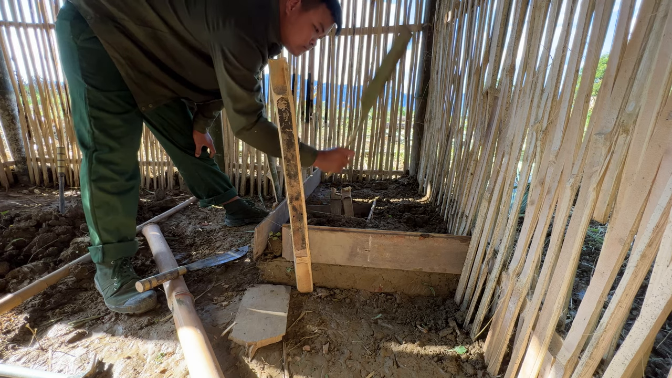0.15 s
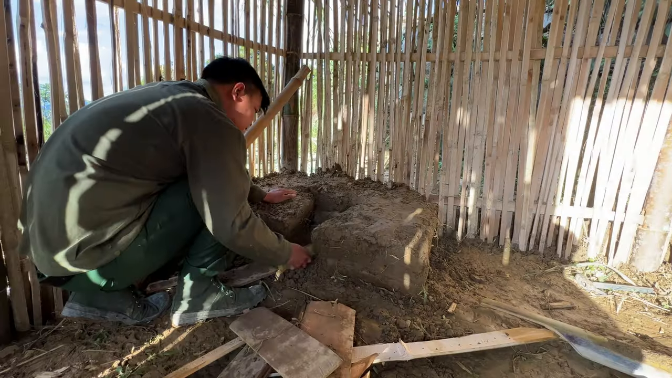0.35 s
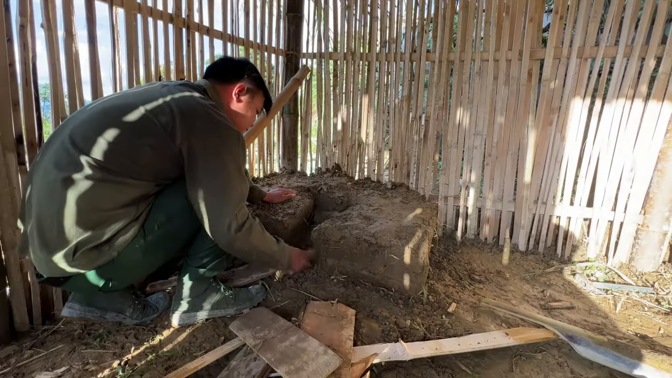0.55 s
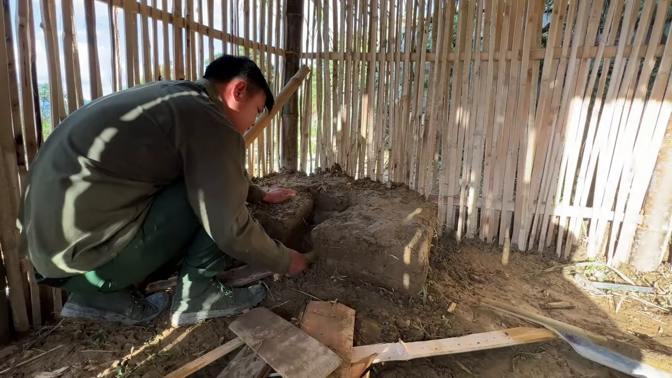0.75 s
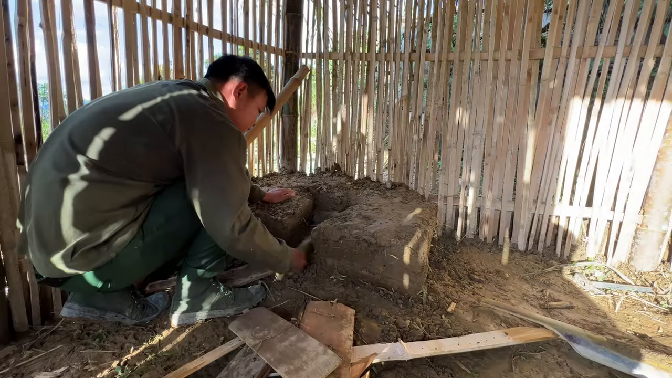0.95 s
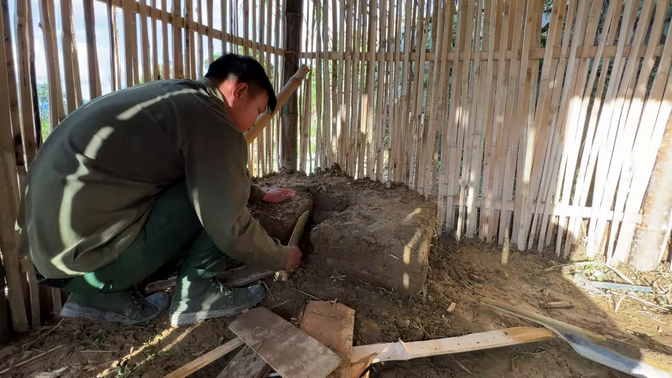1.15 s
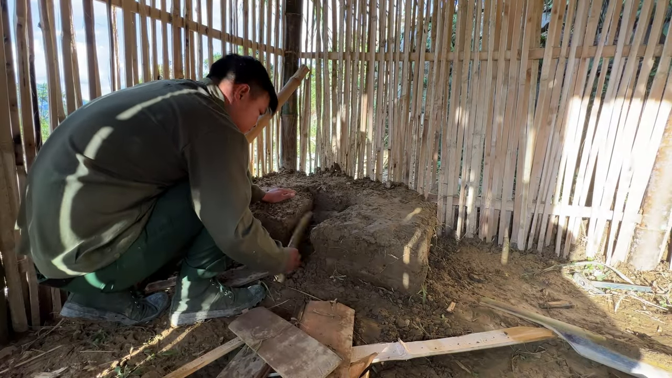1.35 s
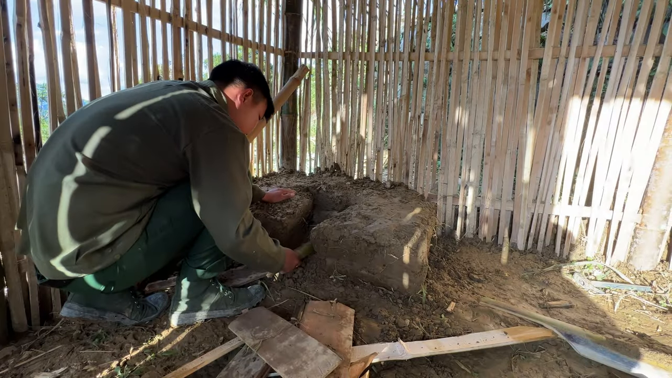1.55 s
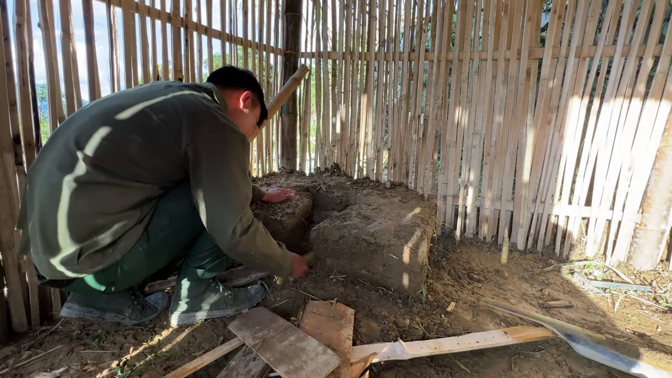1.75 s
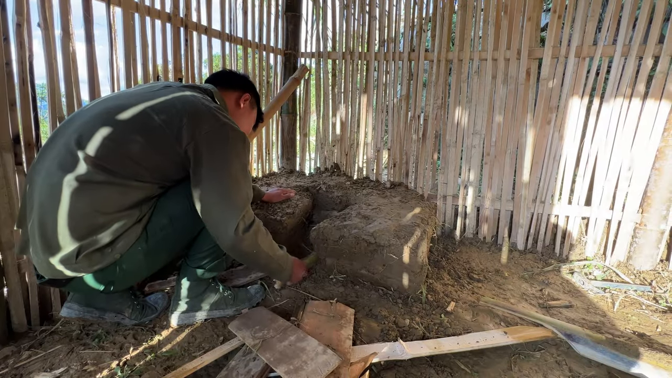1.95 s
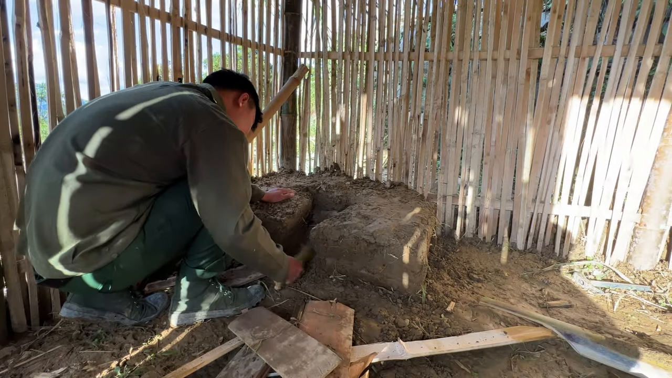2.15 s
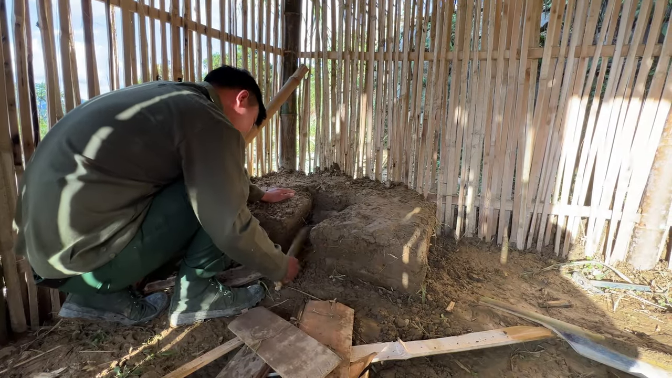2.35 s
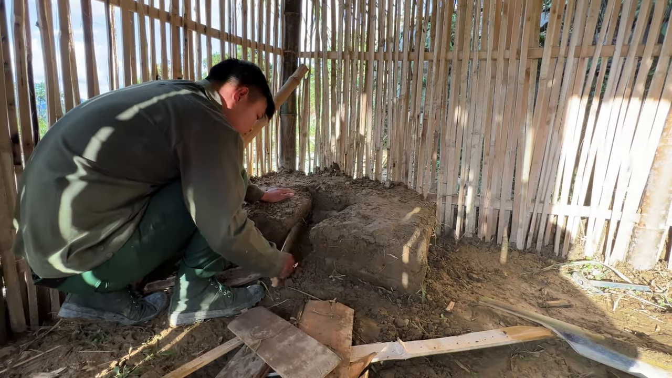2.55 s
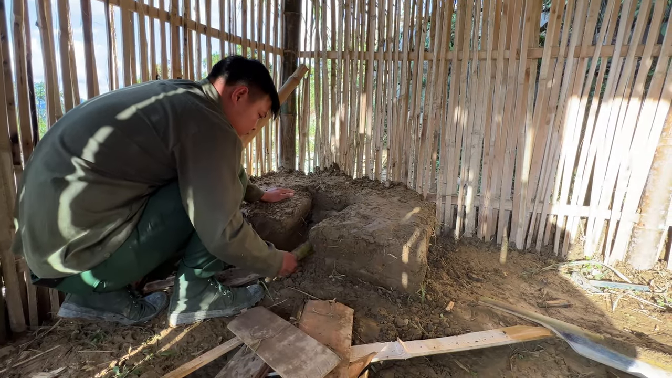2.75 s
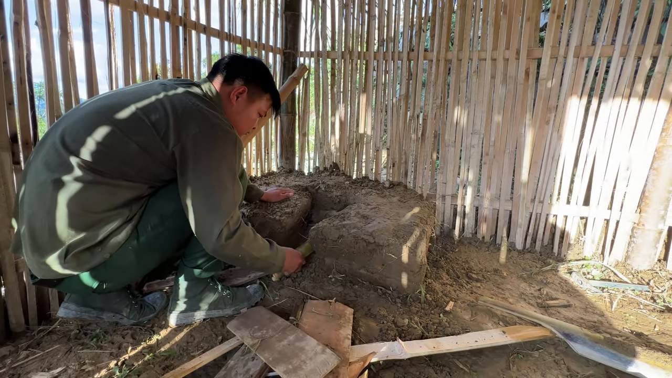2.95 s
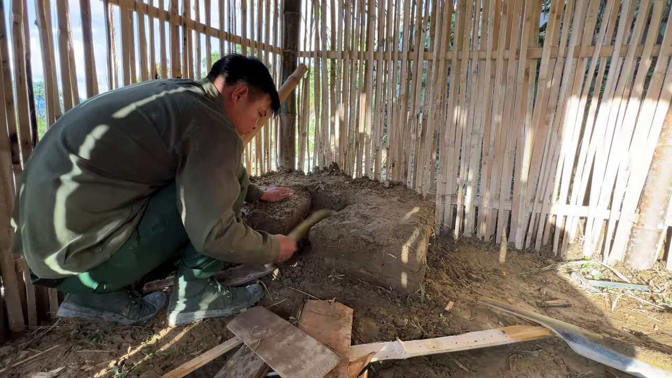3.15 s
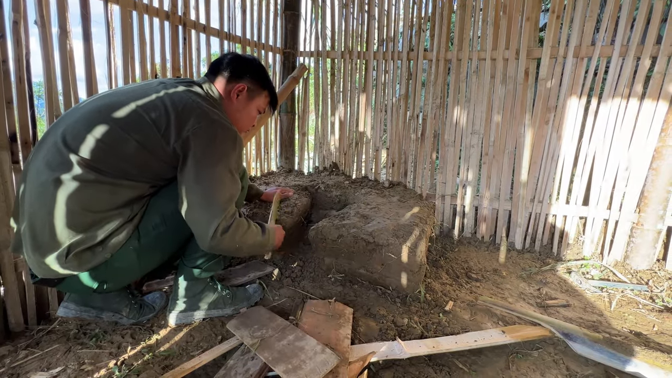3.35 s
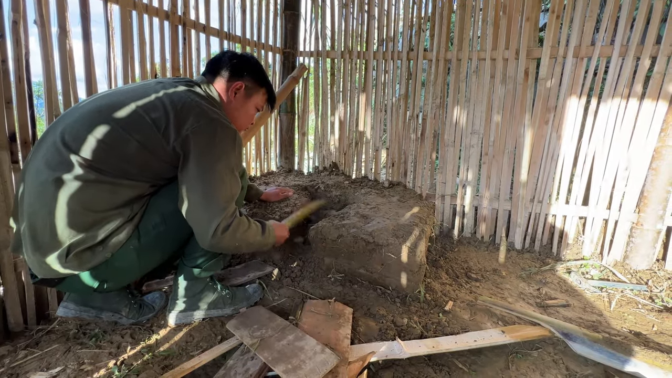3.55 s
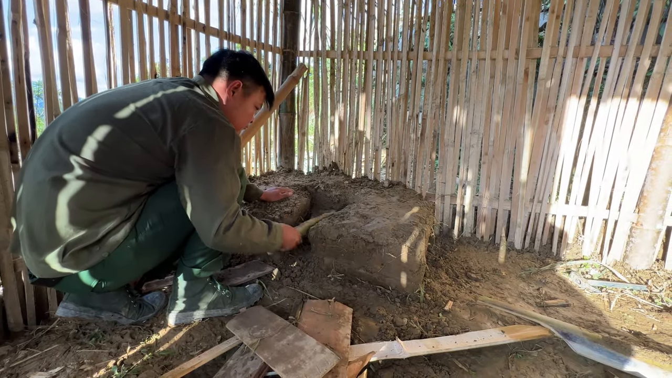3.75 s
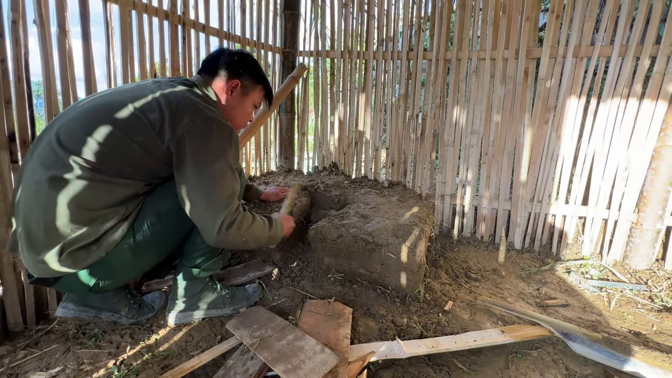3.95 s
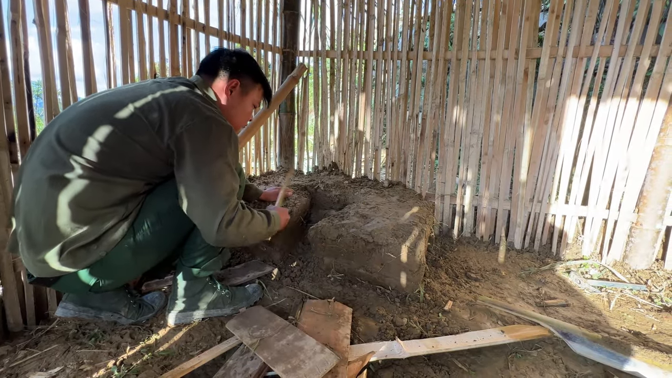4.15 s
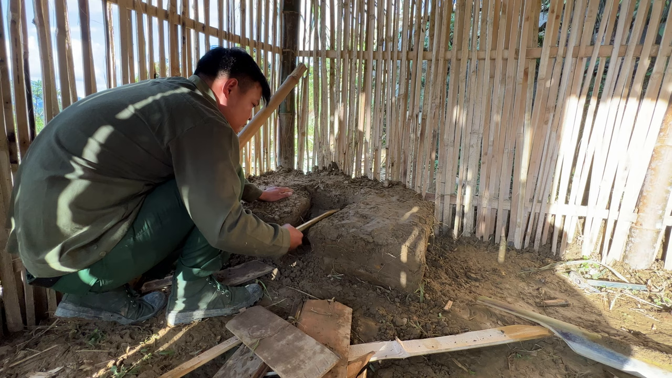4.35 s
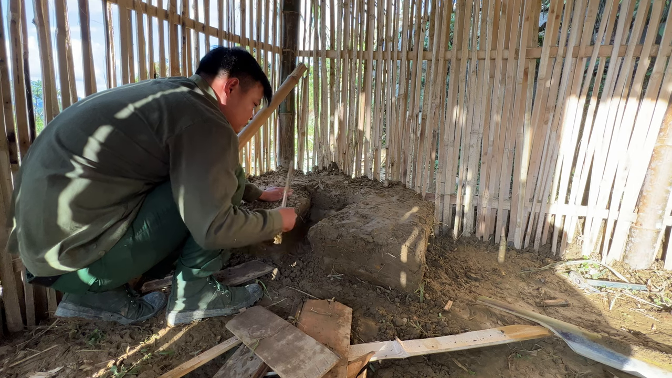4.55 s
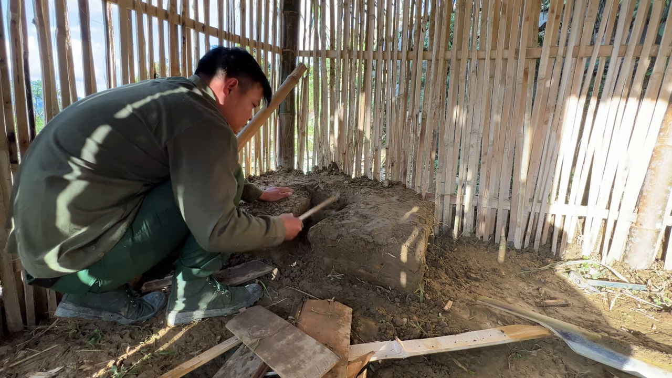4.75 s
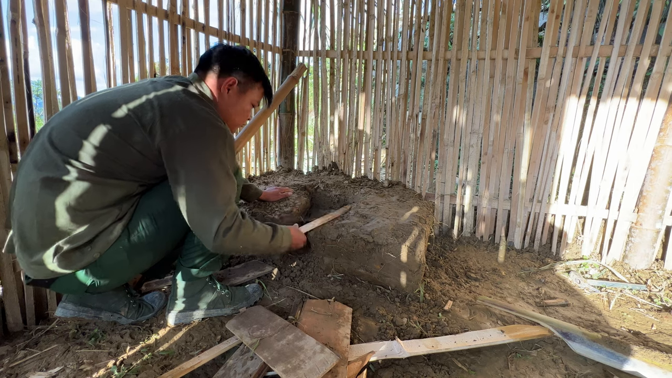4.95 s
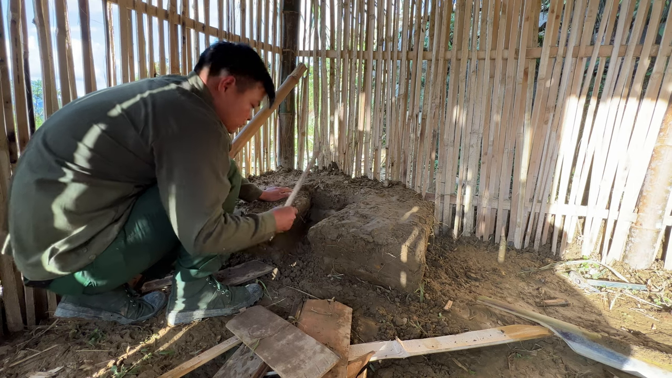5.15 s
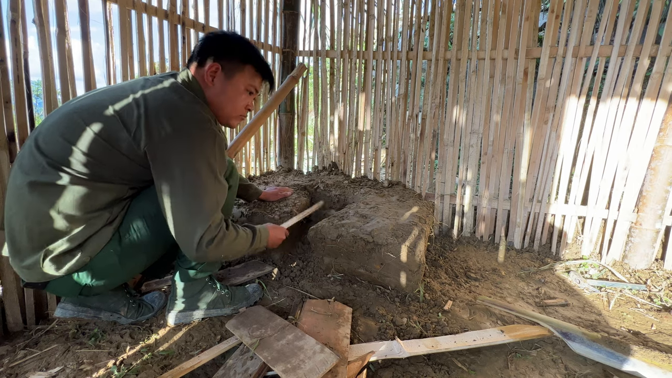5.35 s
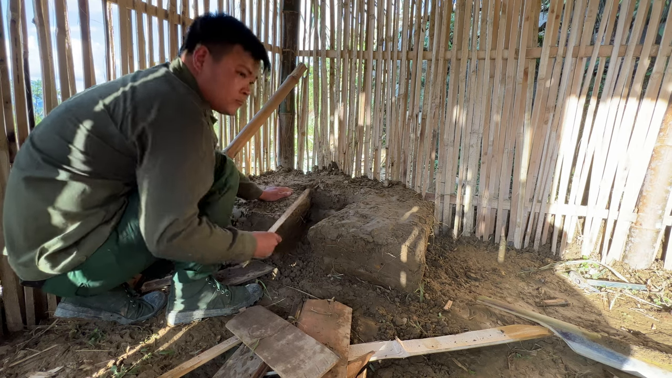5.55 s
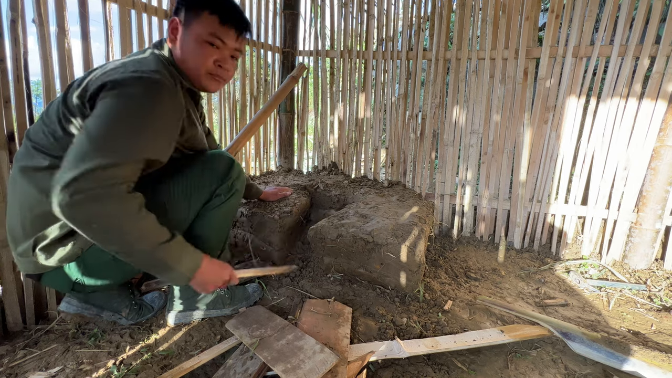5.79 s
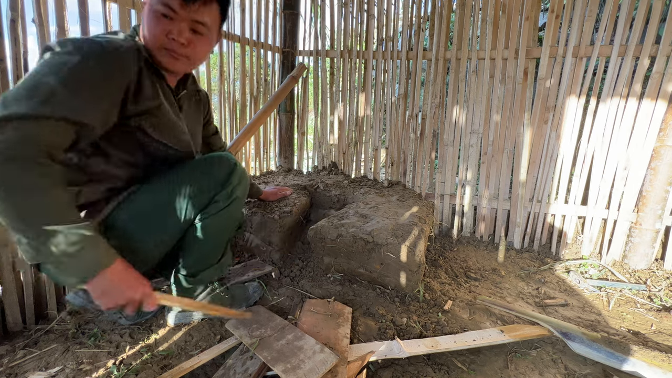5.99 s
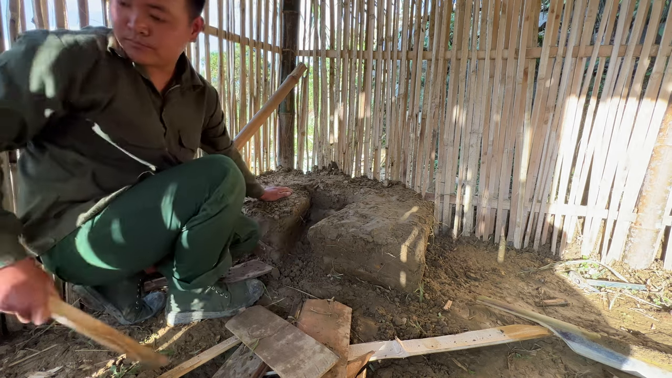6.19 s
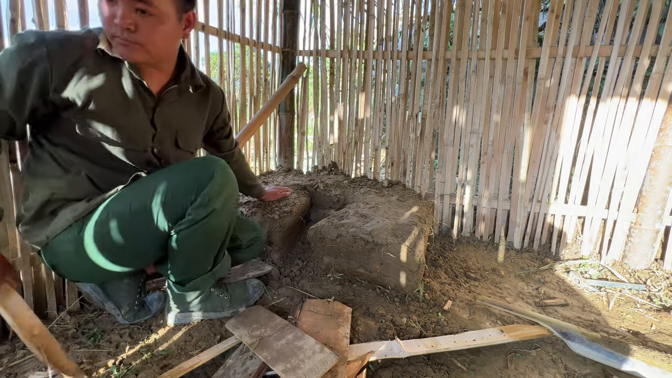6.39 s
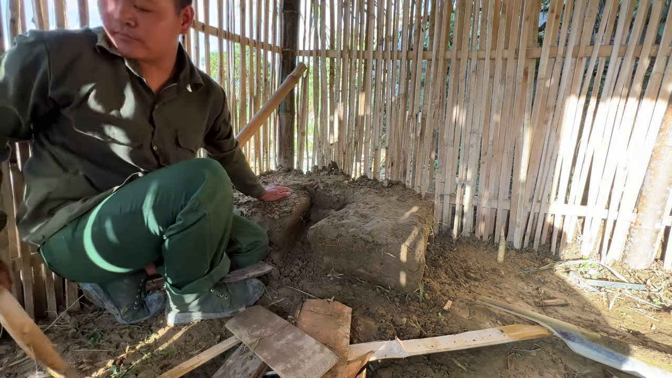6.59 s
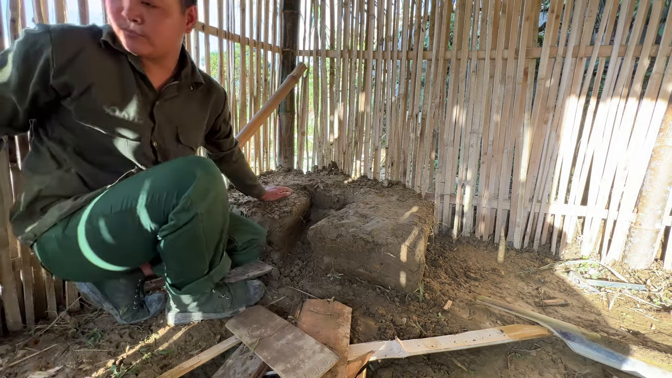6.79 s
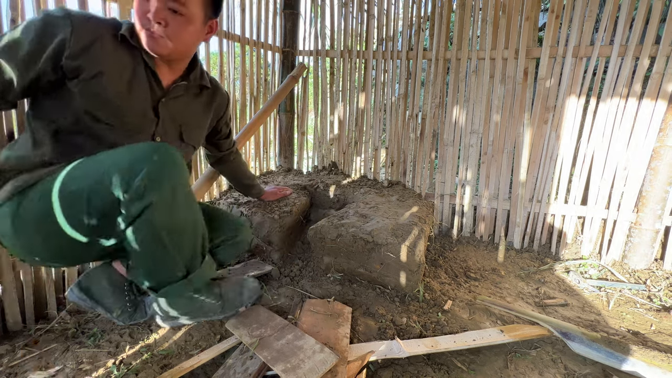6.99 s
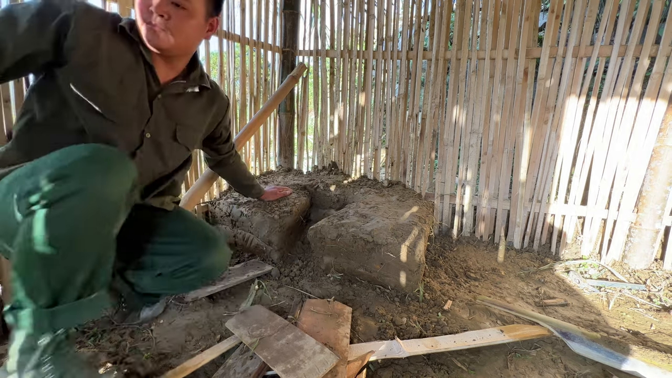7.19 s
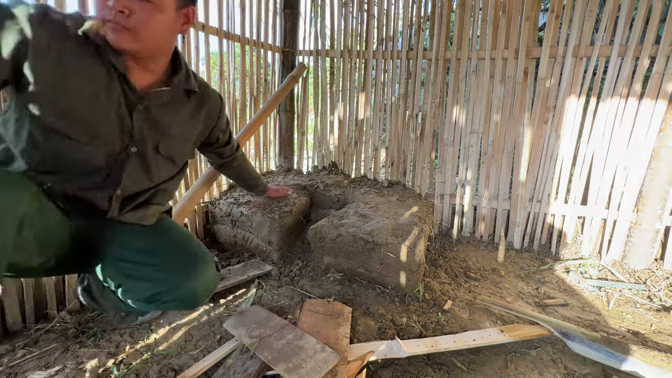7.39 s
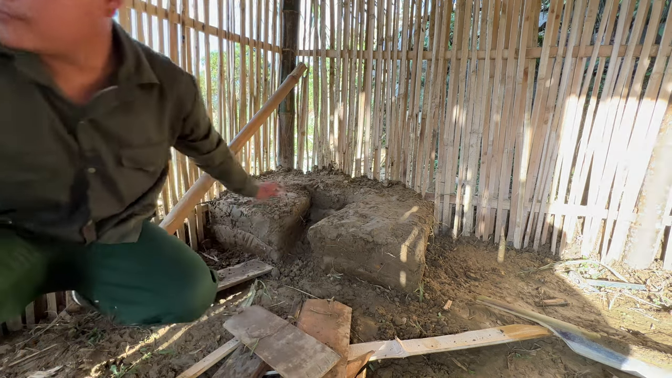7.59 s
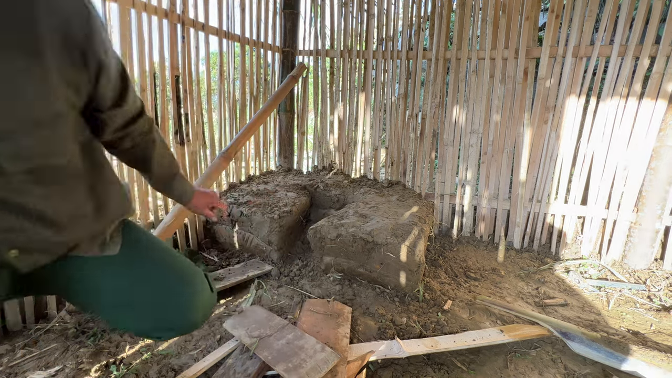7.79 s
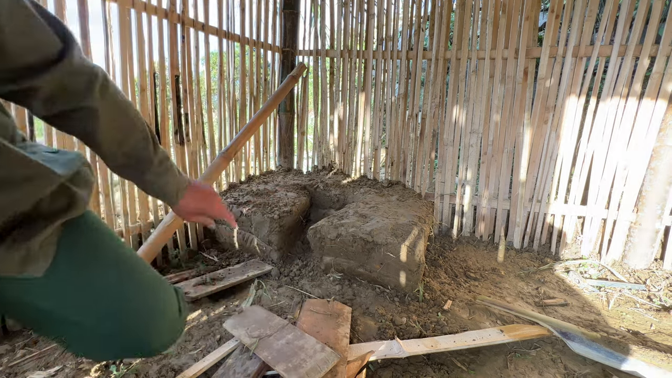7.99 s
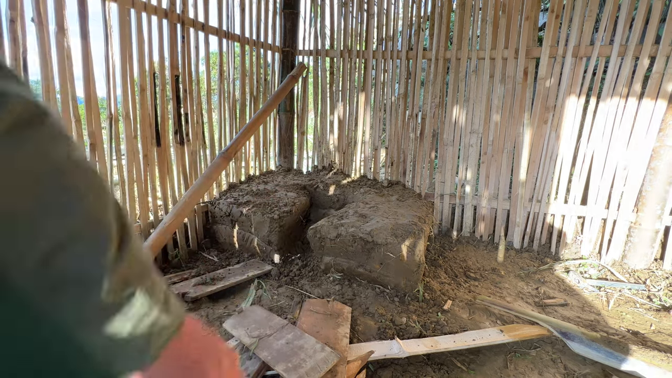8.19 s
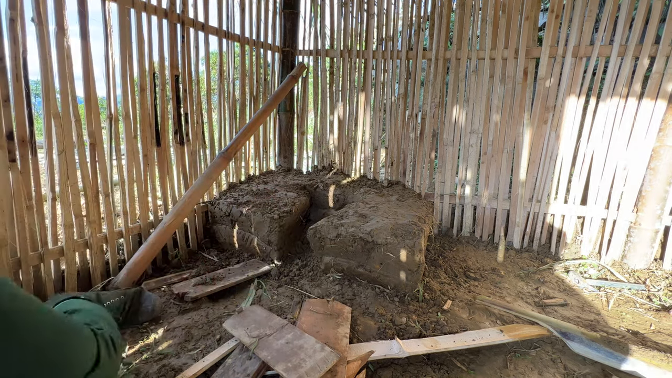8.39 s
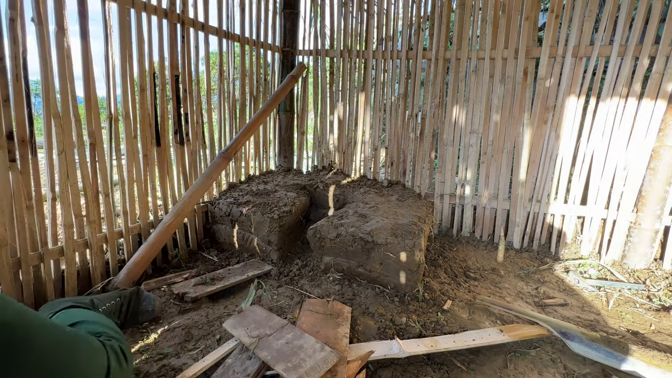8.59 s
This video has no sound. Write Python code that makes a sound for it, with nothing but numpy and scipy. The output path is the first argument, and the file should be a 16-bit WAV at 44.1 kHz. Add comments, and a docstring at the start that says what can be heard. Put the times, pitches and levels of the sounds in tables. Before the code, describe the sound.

Crickets and cicadas trill outdoors. Right at the start one hard blow rings a plank form. Then a short wooden stick tamps an earth mound, light and loud taps alternating, later slower and stronger, each with a click, gritty spray and low thud. After about five seconds the blows stop; cloth rustles, shoes scuff, twigs snap and one heavy step knocks. Close microphone in a slatted shelter, sounds leaning left, short dense tail.

```python
"""Insects sing outdoors, with a nearer wash and cricket heard only at the opening; a plank form takes one blow.
A short wooden stick tamps an earth mound inside a slatted shelter: clicks, rings, grit and a thud make each
blow. The worker then turns and rises: grainy noise makes cloth rub, and shoes scuff and twigs snap in short
bursts. Crickets and cicadas are noise in narrow resonances, over a far rumble and air."""
import sys
import numpy as np
from scipy import signal
from scipy.fft import rfft, irfft, next_fast_len
from scipy.io import wavfile

SR = 44100
rng = np.random.default_rng(int(sys.argv[2]) if len(sys.argv) > 2 else 0)


def wrap_up_sound(samples):
    """Save the sound to the file named by the first command line argument, as 16-bit audio."""
    columns = np.atleast_2d(samples).T
    # keep every value between -1 and 1, then stretch to whole-number steps
    tamed = np.clip(columns, -1, 1)
    steps = np.round(tamed * 32767).astype(np.int16)
    wavfile.write(sys.argv[1], SR, steps)


N = 380583

# Borders between the eight pitch ranges ("parts") of a blow: border_hz
PARTS_HZ = [130, 420, 800, 1500, 2200, 4000, 9000]
WASH_END_S = 0.415   # the nearer wash and cricket stop here


def from_db(db):
    """Decibels to a plain gain."""
    return 10 ** (np.asarray(db) / 20)


def rms_one(x):
    """Scale a sound to an average (rms) strength of 1."""
    return x / np.sqrt(np.mean(x ** 2) + 1e-20)


def in_time(rows):
    """Join the points of each column by straight lines over the whole scene."""
    s, *columns = np.transpose(rows)
    return [np.interp(np.arange(N) / SR, s, column) for column in columns]


def at_hz(points, hz):
    """Read a curve of (pitch_hz, value) points, spaced by musical interval."""
    points_hz, values = np.transpose(points)
    return np.interp(np.log(hz), np.log(points_hz), values)


def band(x, low_hz, high_hz):
    """Keep one range of pitches."""
    sos = signal.butter(2, [low_hz, min(high_hz, 19000)], "band", fs=SR, output="sos")
    return signal.sosfilt(sos, x)


def drift(rate_hz):
    """Slow random wandering with spread 1, made at every 40th sample."""
    r = np.exp(-80 * np.pi * rate_hz / SR)
    draws = rng.standard_normal(N // 40 + 2002)
    slow = signal.lfilter([1], [1, -2 * r, r * r], draws)[2000:]
    return np.interp(np.arange(N) / 40, np.arange(len(slow)), rms_one(slow))


def shaped(length, db_at, likeness=None):
    """Stereo noise of a given spectrum; how alike the sides are and how far it leans left vary with pitch."""
    # Usual likeness of the two sides: pitch_hz, likeness (1 = same, -1 = opposite)
    usual_likeness = [(60, 1), (240, 0.24), (950, -0.7), (3770, 0.44), (15000, 0.33)]
    # Lean to the left: pitch_hz, left_over_right_db
    left_lean = [(60, -2), (180, 1.5), (550, 3.5), (1650, 2), (4970, 9), (15000, -0.5)]
    hz = np.maximum(np.fft.rfftfreq(length, 1 / SR), 10)
    mid, side = rfft(rng.standard_normal((2, length)))
    alike = np.clip(at_hz(usual_likeness if likeness is None else likeness, hz), -1, 1)
    pair = np.sqrt(1 + alike) * mid + np.sqrt(1 - alike) * side * [[1], [-1]]
    lean_db = at_hz(left_lean, hz) * [[.5], [-.5]]
    return irfft(pair * from_db(db_at(hz) + lean_db), length)


def noise(spectrum):
    """Steady stereo noise with the colour of a table, rms 1."""
    return rms_one(shaped(next_fast_len(N), lambda hz: at_hz(spectrum, hz))[:, :N])


def to_ears(x, lean_db):
    """A source on the left reaches the right side later, weaker and with less treble around 6 kHz."""
    right_lag = 3   # samples
    treble = signal.lfilter(*signal.butter(1, [4200, 7800], "band", fs=SR), x)
    right = from_db(-1.5) * x - treble * (1 - from_db(-lean_db))
    return np.array([x, np.roll(right, right_lag)])


def shelter(x):
    """Slats and ground scatter a sound into a dense tail that dies band by band, with a new pattern each time."""
    # How long the tail takes to fall 60 dB: pitch_hz, fade_s
    tail_fade = [(100, 0.2), (400, 0.12), (1100, 0.13), (3000, 0.12), (6000, 0.15), (9000, 0.1),
                 (12000, 0.16), (15000, 0.033)]
    # Colour of the scattered sound: pitch_hz, level_db
    tail_colour = [(100, -2), (300, -4.5), (800, -4.5), (2000, -1.5), (4500, 0), (6500, 2.5), (9000, -1.5),
                   (12000, 1), (15000, -12)]
    # Likeness of the two sides of the tail: pitch_hz, likeness
    tail_likeness = [(60, 1), (250, 0.24), (900, .3), (3000, 0.04), (15000, 0.05)]
    length = len(x)
    edges = 60 * 2 ** np.arange(0, 8.6, .75)
    t = np.arange(length) / SR
    white = shaped(length, lambda hz: at_hz(tail_colour, hz), tail_likeness)
    tail = np.zeros((2, length))
    for low, high in zip(edges, edges[1:]):
        tail += band(white, low, high) * from_db(-60 * t / at_hz(tail_fade, low))
    tail *= np.clip(t / 0.0051 - .5, 0, 1)   # first reflections need a few ms
    tail /= np.sqrt(np.sum(tail ** 2) / 2)
    return signal.fftconvolve(x[None], tail, axes=1)[:, :length]


def place(out, s, sound, scattered, room_db):
    """Add the direct sound and the tail of its scattered share, from time s."""
    both = to_ears(sound, lean_db=19.0) + from_db(room_db) * shelter(scattered)
    return out + np.pad(both, [(0, 0), (round(s * SR), N)])[:, :N]


def song(resonances, throb):
    """Many wing strokes blur to noise in narrow resonances, pulsed by the throb."""
    def lines(hz):
        power = sum(from_db(2 * db) / (1 + ((hz - top) / max(width, 5) * 2) ** 4)
                    for top, width, db in resonances)
        return 10 * np.log10(power)
    return rms_one(throb * shaped(next_fast_len(N), lines)[:, :N])


def rumble_and_air(air_db):
    """Far rumble and air: two coloured noises whose levels wander."""
    # Colour of the rumble: pitch_hz, relative_db (per Hz)
    rumble_colour = [(15, -44), (25, -25), (37, 1.5), (59, 2), (145, -3), (216, -19.5), (339, -8),
                     (600, -26), (780, -32.5), (1320, -120)]
    # Colour of the air: pitch_hz, relative_db
    air_colour = [(240, -63), (400, -34), (914, -18), (989, -26.5), (1070, -19), (3380, -26), (4200, -23),
                  (5460, -46.5), (9240, -120)]
    rumble = from_db(-70 + 1.8 * drift(4)) * noise(rumble_colour)
    return rumble + from_db(air_db + 1.2 * drift(13)) * noise(air_colour)


def cicada_wash(cicada_db):
    """Cicadas blend into a coloured noise; a nearer wash is heard with it only at the opening."""
    # Colour of the lasting wash: pitch_hz, relative_db
    wash_colour = [(2500, -34.5), (3900, -8), (5000, -6.5), (6000, -5), (7500, -1), (8500, -11.5),
                   (9500, -10), (11500, -23.5), (12500, -43.5), (16000, -72)]
    # Colour of the nearer opening wash: pitch_hz, relative_db
    near_colour = [(1000, -41.5), (1900, -16), (2500, -6), (4200, -10), (6000, -5), (8000, -16.5),
                   (9500, -36.5)]
    wash = from_db(cicada_db + 9.5 + 1.3 * drift(40)) * noise(wash_colour)
    near = from_db(-58.5 + 1.3 * drift(30)) * noise(near_colour)
    return wash + near * (np.arange(N) < WASH_END_S * SR)


def crickets():
    """A steady cricket trill near 4.5 kHz throbs unevenly and fades at the end."""
    # Wing resonances: pitch_hz, width_hz, relative_db
    cricket_wings = [(4340, 230, -5.5), (4586, 17, 7), (4480, 420, -3.5)]
    level_db, fade_start_s, fade_db_per_s = -63, 8.4, 155
    t = np.arange(N) / SR
    throb_turns = np.cumsum(23.5 + 2.2 * drift(1)) / SR   # about 23.5 throbs a second
    trill_db = 1.6 * np.sin(2 * np.pi * throb_turns) + 0.8 * drift(7.8) + 1.2 * drift(0.81)
    fading_db = level_db - fade_db_per_s * (t - fade_start_s).clip(0)
    return from_db(fading_db) * song(cricket_wings, from_db(trill_db))


def chirpers():
    """Each chirping cricket is stronger for about half of its period, and its level wanders a little."""
    # Crickets: wing resonances (pitch_hz, width_hz, relative_db), chirp_middle_s, period_s,
    # level points (time_s, level_db)
    chirping = [([(8510, 290, 0)], .485, .2115, [(.41, -70.5), (2.4, -66), (3.1, -73), (3.2, -100)]),
                ([(8380, 220, 0)], 8.53, 0.18, [(4.2, -85), (5.4, -78), (7.6, -68.5), (8.63, -67)])]
    t = np.arange(N) / SR
    out = np.zeros((2, N))
    for wing, middle, period, level in chirping:
        chirp_db = 2.9 * np.tanh(2.2 * np.cos(2 * np.pi * (t - middle) / period))
        level_db = in_time(level)[0] + 0.54 * drift(8)
        out += from_db(level_db) * song(wing, from_db(chirp_db))
    return out


def cicada_swell():
    """One cicada swells, holds and fades: fast uneven tymbal buzz in a broad body resonance."""
    # Level of the swell: time_s, level_db
    swell_level = [(1.1, -91.5), (1.52, -56), (2.15, -53), (2.5, -85.5)]
    # Resonances of tymbal and body: pitch_hz, width_hz, relative_db
    tymbal = [(4730, 320, -4.5), (6100, 1000, -2.5), (6200, 410, -14.5)]
    buzz = from_db(3.4 * drift(60) + 1.7 * drift(8))
    return from_db(in_time(swell_level)[0]) * song(tymbal, buzz)


def near_cricket(stroke_hz, wing_hz, width_hz):
    """Slightly uneven strokes pulse one wing resonance, a narrow noise with side bands, heard only at the
    opening."""
    turns = np.cumsum(1 + 0.0055 * drift(17)) / SR
    pulsing = 1 + 0.53 * np.cos(2 * np.pi * stroke_hz * turns)
    blur = rms_one(band(rng.standard_normal(N), wing_hz - width_hz, wing_hz + width_hz))
    singing = np.arange(N) < WASH_END_S * SR
    return from_db(-62.5 + 2.5 * drift(11)) * singing * rms_one(pulsing * blur)


def outdoors():
    """Far rumble and air, a cicada wash and crickets add up outside."""
    # Levels before wandering: time_s, air_db, cicada_db (the wash then gains 9.5 dB)
    outdoor_levels = [(0, -72, -80.5), (.5, -73, -79), (1.9, -66.5, -69), (2.8, -72, -76.5),
                      (4.9, -71.5, -75.5), (5.7, -80, -75.5), (6.34, -82, -70.5), (6.7, -78.5, -79.5),
                      (7.09, -61.5, -68), (7.5, -73, -74), (8.1, -63, -72.5), (8.63, -82, -79.5)]
    air_db, cicada_db = in_time(outdoor_levels)
    beds = rumble_and_air(air_db) + cicada_wash(cicada_db)
    songs = crickets() + chirpers() + cicada_swell()
    return beds + songs + near_cricket(270, 3570, 50) * from_db([[2.5], [-2.5]])   # leans left


def rustle():
    """Cloth and loose soil rub: grainy, patchy noise in three ranges, faded in once the blows have stopped."""
    # Rubbing as the worker moves: time_s, level_db
    rubbing = [(5.2, -90.5), (5.65, -77.5), (5.86, -87), (6.2, -78), (6.57, -83.5), (6.82, -80),
               (6.99, -63), (7.14, -67), (7.39, -78), (7.78, -65.5), (7.87, -60.5), (8.06, -71.5),
               (8.35, -77), (8.54, -86), (8.6, -65.5)]
    # Thin high swishes: middle_s, length_s, level_db
    swishes = [(5.657, 0.21, -68.5), (6.252, .45, -67.5), (6.92, 0.32, -67.5), (7.85, 0.062, -60.5),
               (8.067, .1, -73.5)]
    edge_db, body_db = -9, -19   # fall by either end of a swish; its share in the middle range
    moving = np.clip(np.arange(N) / SR * 5 - 26, 0, 1)   # rises from 5.2 to 5.4 s
    t = np.arange(N) / SR
    grains = from_db(2.5 * np.minimum(rng.exponential(1, N), 5))
    move_db, = in_time(rubbing)
    swish = sum(from_db(db + edge_db * ((t - s) / length * 2) ** 2) for s, length, db in swishes)
    middle = from_db(-34.5 + 0.55 * move_db) + from_db(body_db) * swish
    ranges_hz = [(150, 1380), (1400, 3570), (11500, 19000)]
    out = np.zeros((2, N))
    for gain, edges in zip([from_db(move_db), middle, swish], ranges_hz):
        grainy = grains * noise([(20, 0), (20000, 0)])
        rubbed = rms_one(band(band(grainy, *edges), *edges))   # filtered twice for steeper edges
        patches = from_db(1.5 + 4.5 * drift(20))
        out += gain * patches * rubbed
    return moving * out


def hums():
    """Soft low tones with a rough edge as weight shifts: narrow noise that rises and dies away."""
    # Hums: start_s, pitch_hz, level_db, fade_s (to fall 60 dB), rise_s
    hollow_hums = [(5.6, 350, -60.5, 0.39, 0.023), (7.85, 84, -41, 0.35, 0.0083),
                   (7.965, 82, -51, 0.11, .01)]
    tones = np.zeros(N)
    for s, hz, db, t60, rise in hollow_hums:
        since = (np.arange(N) / SR - s).clip(0)
        rough = rms_one(band(rng.standard_normal(N), hz * 0.95, hz * 1.32))
        tones += from_db(db - 60 * since / t60) * (1 - np.exp(-since / rise)) * rough
    return to_ears(tones, lean_db=14.0)


def board_tone():
    """A loaded board sings briefly: a soft held tone that sags in pitch."""
    start_s, length_s, edge_s = 7.92, .135, 0.018
    start_hz, sag_hz_per_s = 286, 170
    level_db, fade_db_per_s = -49.5, 60
    t = np.arange(N) / SR - start_s
    held = np.clip(np.minimum(t, length_s - t) / edge_s, 0, 1)
    held = held * from_db(level_db - fade_db_per_s * t.clip(0) + 2.5 * drift(30))
    return to_ears(held * np.sin(2 * np.pi * (start_hz - sag_hz_per_s * t / 2) * t), lean_db=6.0)


def scrape():
    """A twig drags over the ground: uneven slips ring the twig's modes."""
    # Ways the twig rings: pitch_hz, relative_db, fade_s (to fall 60 dB)
    twig_modes = [(710, -29, .012), (980, -2.5, 0.016), (1550, 1, 0.0061), (2160, -3, .006),
                  (3200, 11, 0.0091)]
    start_s, length_s, slips_per_s, level_db = 7.024, .056, 1200, -59.5
    t = np.arange(12000) / SR
    slips = (rng.random(len(t)) < slips_per_s / SR) * (t < length_s)
    slips = slips * from_db(3.4 * rng.exponential(1, len(t)).clip(0, 3))
    twig = sum(from_db(db - 60 * t / t60) * np.sin(2 * np.pi * hz * t) for hz, db, t60 in twig_modes)
    sound = from_db(level_db) * signal.fftconvolve(slips, twig)[:len(t)]
    return place(np.zeros((2, N)), start_s, sound, sound, room_db=-25.0)


def scuffs():
    """Shoes and twigs: a click and a gritty burst in four ranges, and the short ring of whatever was knocked."""
    # Contacts: start_s, level_db, then against that level, before a shared 6 dB boost:
    # thud_db, scuff_db, snap_db; ring_hz
    contacts = [(6.804, -51, 3, -30, -7, 267), (6.968, -45.5, -9, -16, -28, 369),
                (7.126, -33, -22, -23, -16, 4070), (7.145, -38, -10, -7, -28, 254),
                (7.162, -33.5, -7.5, -19, -21, 308), (7.179, -35, -20, -3, -32, 840),
                (7.202, -32.5, -11, -2, -10, 570), (7.226, -49, -20, 7, -23, 850),
                (7.25, -43.5, -7, -7, -7.5, 337), (7.291, -47.5, -7, -1, -25, 880),
                (7.519, -50, 2, -19, -7, 1070), (7.689, -49.5, -11, -17, -5, 392),
                (7.877, -18.5, -4.5, -13, -13, 2690), (7.739, -51, -23, -17, -34, 724),
                (7.841, -52, -11.5, -27, 4, 1800), (7.388, -56, -21, -15, -4, 916),
                (8.035, -56, -18, -18, 1.5, 1840), (8.066, -40.5, 3, -20, 1.5, 5600),
                (8.193, -49.5, -1.5, -26.5, -1.5, 296), (8.401, -47, -24, -2.5, -36.5, 940),
                (8.574, -53.5, -14.5, -6.5, -5, 230)]
    # Ranges of thud, scuff, snap and tick: low_hz, high_hz
    ranges_hz = [(60, 185), (400, 990), (1500, 6200), (4000, 8500)]
    out, t = np.zeros((2, N)), np.arange(12000) / SR
    for s, level_db, thud_db, scuff_db, snap_db, ring_hz in contacts:
        t60 = 0.027 * (1e3 / ring_hz) ** 0.31   # higher rings die sooner
        tick_db = snap_db + 1.5
        parts_db = [thud_db, scuff_db, snap_db, tick_db]
        grit = rng.standard_normal(len(t)) * from_db(5.9 * np.minimum(rng.exponential(1, len(t)), 4))
        grit[10] = 31.0   # the click
        sound = from_db(-2 - 60 * t / t60) * np.sin(2 * np.pi * ring_hz * t)
        for (low, high), part_db, longer in zip(ranges_hz, parts_db, [3.5, 1.3, 1.84, 0.57]):
            fade = from_db(part_db + 6.0 - 60 * t / (t60 * longer))
            rise = 1 - np.exp(-t * low * 0.55)
            sound += fade * rms_one(band(grit, low, high)) * rise
        sound = from_db(level_db) * sound
        out = place(out, s, sound, sound, room_db=-9.0)
    return out


def coloured_click(parts_db, length):
    """A click that starts at once (minimum phase); its spectrum joins the parts' levels smoothly."""
    edges = np.array([40, *PARTS_HZ, 17000])
    hz = np.maximum(np.fft.rfftfreq(length, 1 / SR), 10)
    middles_hz = np.sqrt(edges[1:] * edges[:-1])
    per_hz_db = parts_db - 10 * np.log10(edges[1:] / SR)
    log_spectrum = np.log(from_db(at_hz(list(zip(middles_hz, per_hz_db)), hz)))
    cepstrum = irfft(log_spectrum, length)
    cepstrum[1:length // 2] *= 2   # folding it puts all of the click after time zero
    return irfft(np.exp(rfft(cepstrum[:length // 2], length)), length)


def ringing(modes, luck, parts_db, thud_rise_s, t):
    """Struck modes build up and die away; chance varies pitch and strength, and low ones sink in pitch."""
    ring = np.zeros(len(t))
    for (hz, level_db, t60), (tune, touch) in zip(modes, luck):
        part = np.searchsorted(PARTS_HZ, hz)
        low = part < 2
        rise = 1 - np.exp(-t / (thud_rise_s if low else 1.2 / hz))   # others build in about 1.2 cycles
        sink_s = 0.0051 * (1 - np.exp(-t / 0.013)) * low
        gain = from_db(parts_db[part] + level_db + 3 * touch - 60 * t / max(t60, .003))
        ring -= gain * rise * np.sin(2 * np.pi * hz * (1 + 0.023 * tune) * (t + sink_s))
    return ring


def rounded_thud(thud_db, thud, t):
    """The struck body gives one rounded thud that drops in pitch."""
    settle_hz, rise_s, t60 = thud
    falling_hz = settle_hz + 190 * np.exp(-t / 0.0032)
    envelope = from_db(thud_db + 13.0 - 60 * t / t60) * (1 - np.exp(-(t / rise_s) ** 2))
    return envelope * np.sin(2 * np.pi * np.cumsum(falling_hz) / SR)


def blows(rows, modes, crack_db, grit_db, grit_t60_s, thud_rise_s, room_db, splash_db, thud):
    """Each blow cracks, sprays grit and rings the modes; the low answer builds over a few ms and sinks in pitch."""
    out, t = np.zeros((2, N)), np.arange(12000) / SR
    luck = rng.standard_normal((len(rows), len(modes), 2))
    for (s, level_db, *parts_db), draws in zip(rows, luck):
        crack = -np.roll(coloured_click(parts_db, len(t)), 20)
        spray = rng.standard_normal(len(t)) * from_db(grit_db - 60 * t / grit_t60_s)
        grit = signal.fftconvolve(spray, crack)[:len(t)]
        ring = ringing(modes, draws, parts_db, thud_rise_s, t)
        ring += rounded_thud(parts_db[1], thud, t)
        direct = ring + grit + from_db(crack_db) * crack
        # the broad splash fills the shelter more evenly than the rings
        scattered = .3 * ring + from_db(splash_db) * crack
        gain = from_db(level_db)
        out = place(out, s - .0005, gain * direct, gain * scattered, room_db)
    return out


def plank_blow():
    """One blow on a plank form: the plank rings and thuds, and the shelter scatters it."""
    # The blow: start_s, level_db, then against that level: deep_thump_db, earth_thud_db, knock_db,
    # clack_db, ring_db, upper_ring_db, grit_db, fine_grit_db
    blow = [(0.2703, -5, -22, -16.5, -7, -8, -6, -12.5, -9.5, -16)]
    # Ways the plank rings, before chance varies them: pitch_hz, relative_db, fade_s (to fall 60 dB)
    plank_modes = [(73.6, 6, 0.18), (115, -5.5, 0.089), (228, -14, 0.056), (380, -7.5, 0.027),
                   (624, -8, 0.025), (1016, 5, 0.02), (1180, 7, 0.022), (1572, -3, 0.031), (2400, 6, 0.024),
                   (2778, 0, 0.0017)]
    # Its rounded thud: settle_hz, rise_s, fade_s (to fall 60 dB)
    plank_thud = (115, .012, .1)
    return blows(blow, plank_modes, crack_db=12.0, grit_db=-10.5, grit_t60_s=0.056, thud_rise_s=0.0046,
                 room_db=-0.5, splash_db=18.0, thud=plank_thud)


def stick_parts():
    """Fills in the eight parts of each stick blow from its thud, knock, ring and grit."""
    # Blows: start_s, level_db, then against that level: earth_thud_db, knock_db, stick_ring_db, grit_db
    taps = [(0.5319, -24.5, -2.5, 1, -12, -5.5), (0.771, -23.5, 0, -1, -2, -3),
            (0.9198, -41, 0, -5, 0.5, -4), (0.9963, -12, -11.5, -11, -9.5, -6.5),
            (1.2372, -20, -1.5, -6, -10.5, -4.5), (1.398, -59, 2, -12, -4, -19),
            (1.4603, -26.5, -2.5, 0.5, -8, -3.5), (1.6365, -51, 5, -1, -5, -24),
            (1.724, -12.5, -11.5, -2.5, -8.5, -9.5), (1.8967, -48, -4.5, -7, -11, -22),
            (1.97, -11.5, -10.5, -6, -11, -9.5), (2.1193, -35, 0, -8.5, -4, -17),
            (2.1921, -6.5, -12.5, -9.5, -12.5, -10), (2.3371, -33, -2, -5, -3, -7),
            (2.4156, -6.5, -11.5, -9.5, -13.5, -12), (2.5742, -41.5, 4, -1.5, -10.5, -5),
            (2.671, -12, -9.5, -14.5, -11, -9.5), (2.8486, -54, 4.5, -11.5, -13.5, -23),
            (2.931, -30, -2, 0.5, -6.5, 2.5), (3.0988, -47.5, 0, -7.5, -8, -28),
            (3.1822, -32, 0.5, 0.5, -6.5, -2.5), (3.4625, -18, -13, -5, -6, -2.5),
            (3.7261, -9, -16, -16.5, -6.5, -10), (4.014, -13.5, -8, -8, -10, -3.5),
            (4.3078, -5, -25, -20.5, -11, -18), (4.6778, -25.5, -3.5, -5, -17, -4.5),
            (4.9655, -24.5, -1.5, -1, -14, 0)]
    # Deep thump of the spot struck: time_s, thump_db (before it follows the thud)
    thump_spot = [(.5, -26), (2.2, -25.5), (3.1, -31), (3.7, -30.5), (4.2, -25), (4.7, -32.5), (5, -33)]
    light_db = -23.5   # taps under this lose fine grit
    s, level, thud, knock, ring, grit = np.transpose(taps)
    # the deep thump grows more slowly than the thud
    thump = np.interp(s, *np.transpose(thump_spot)) + 0.65 * (level + thud) - level
    clack = -8.5 + 0.26 * (knock + grit)
    upper = -9 + 0.18 * grit
    fine = -9.5 + 0.74 * grit + .6 * np.minimum(level - light_db, 0)
    return np.transpose([s, level, thump, thud, knock, clack, ring, upper, grit, fine])


def stick_blows():
    """The short stick tamps the earth: wood rings, grit sprays and packed earth thuds."""
    # Ways the stick and earth ring, before chance varies them: pitch_hz, relative_db,
    # fade_s (to fall 60 dB, never under 0.003)
    stick_modes = [(55, 4, 0.14), (84, 10, 0.18), (160, -8.5, 0.064), (234.8, -4, 0.081), (329.2, -10, 0.1),
                   (421, -7, 0.021), (571, 10, 0.02), (660, -2, 0.013), (1150, 8, 0.019), (1470, 4, 0.0018),
                   (1836, 7, 0.03), (2220, -4.5, 0.069), (2397, 14.5, 0.0072), (3150, 13.5, 0.0058),
                   (3590, 11.5, 0.015)]
    # Rounded thud of the earth: settle_hz, rise_s, fade_s (to fall 60 dB)
    earth_thud = (205, .0075, .045)
    return blows(stick_parts(), stick_modes, crack_db=-1.5, grit_db=2.5, grit_t60_s=0.019,
                 thud_rise_s=0.0066, room_db=-3.5, splash_db=20.5, thud=earth_thud)


def scene():
    """Adds the outdoors, the worker's movements and the blows."""
    movements = rustle() + hums() + board_tone() + scrape() + scuffs()
    return outdoors() + movements + plank_blow() + stick_blows()


def record(dry):
    """The microphone loses the deepest bass and some treble, dips near 14 kHz, rounds peaks and cuts the top."""
    dry = signal.lfilter(*signal.butter(1, 9000, fs=SR), dry)
    dip = .95 * band(dry, 12900, 14500)
    dry = signal.sosfilt(signal.butter(3, 42, "high", fs=SR, output="sos"), dry - dip)
    rounded = dry / (1 + np.abs(dry / .92) ** 4) ** .25
    return signal.sosfilt(signal.cheby2(12, 80, 17100, fs=SR, output="sos"), rounded)


dry = scene()
out = record(dry)
wrap_up_sound(out)
```